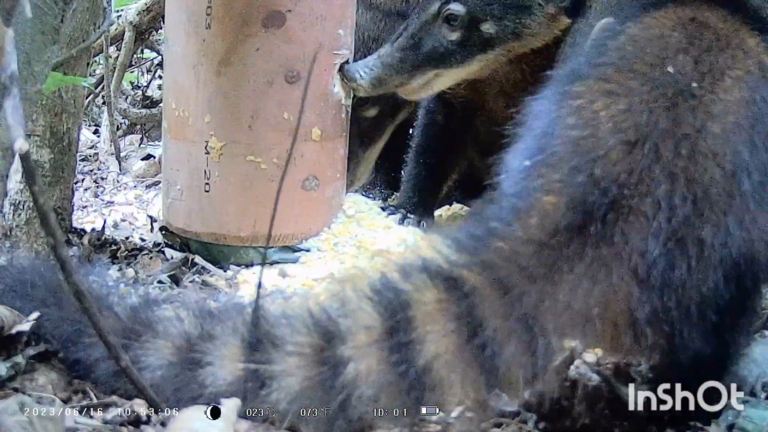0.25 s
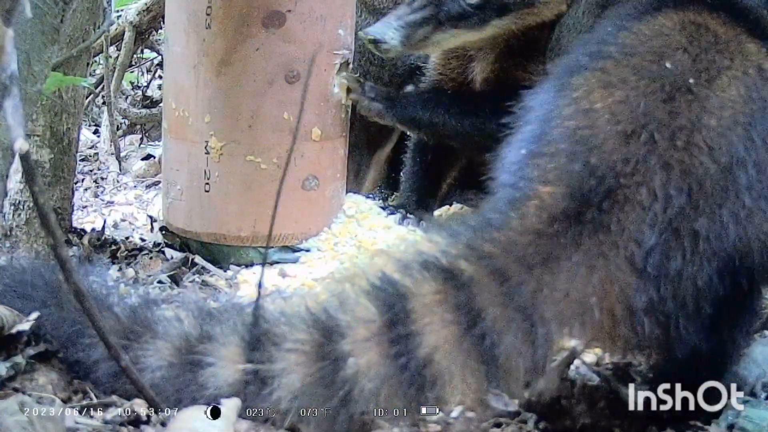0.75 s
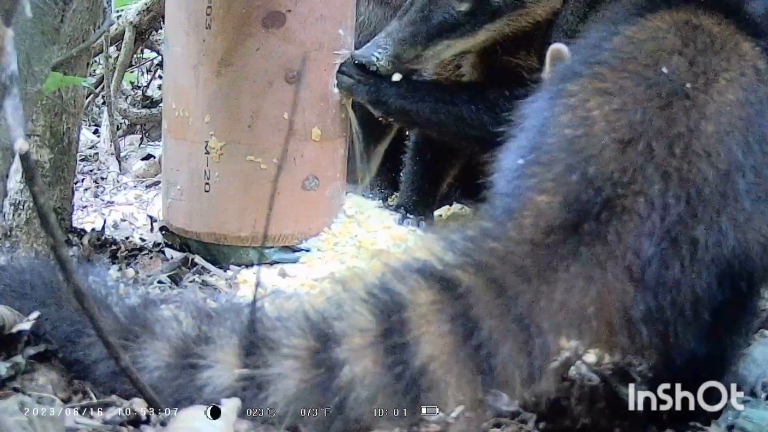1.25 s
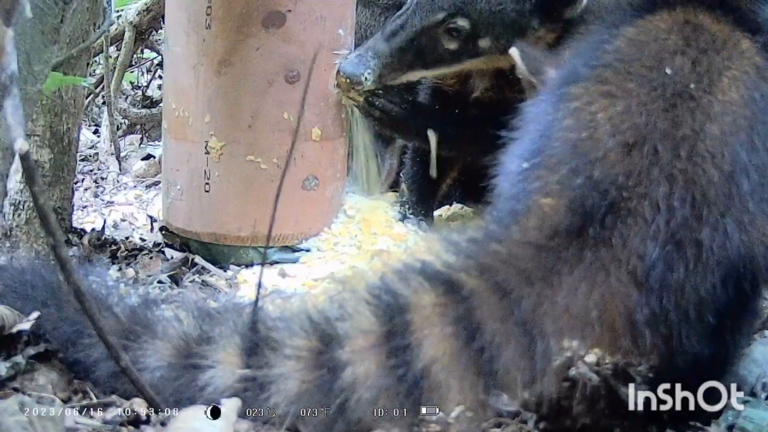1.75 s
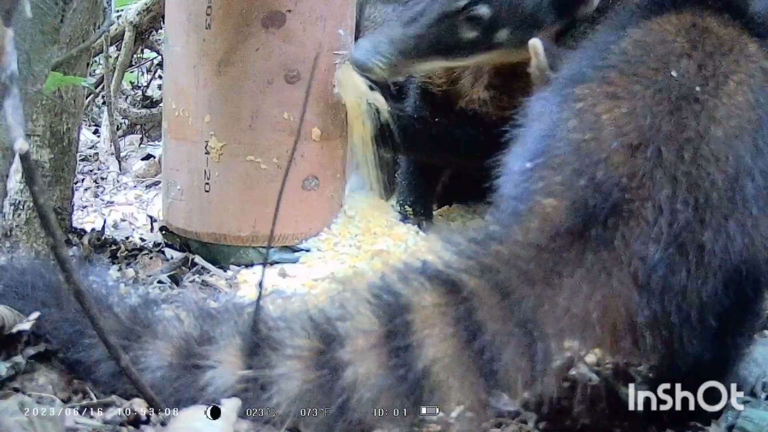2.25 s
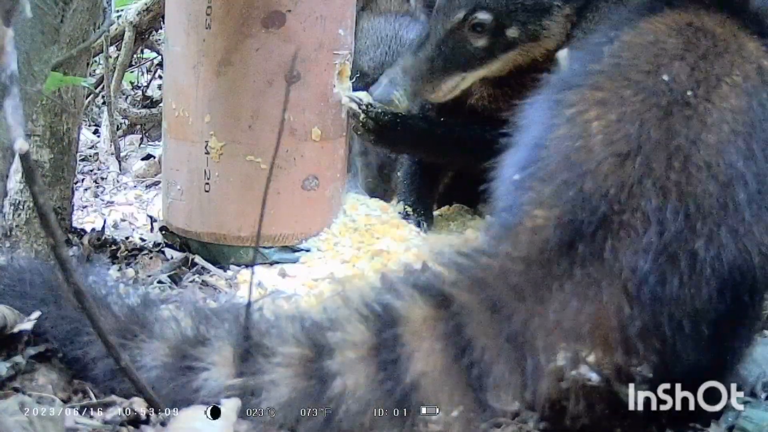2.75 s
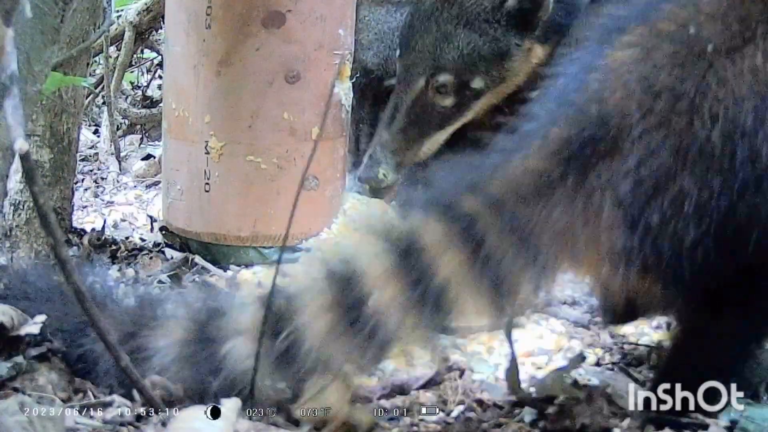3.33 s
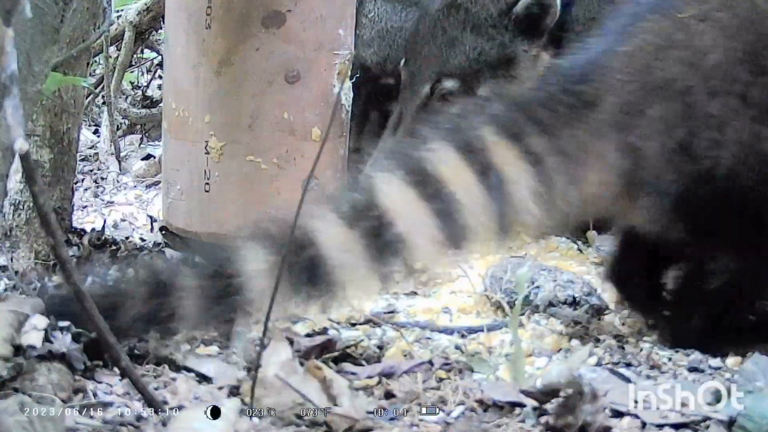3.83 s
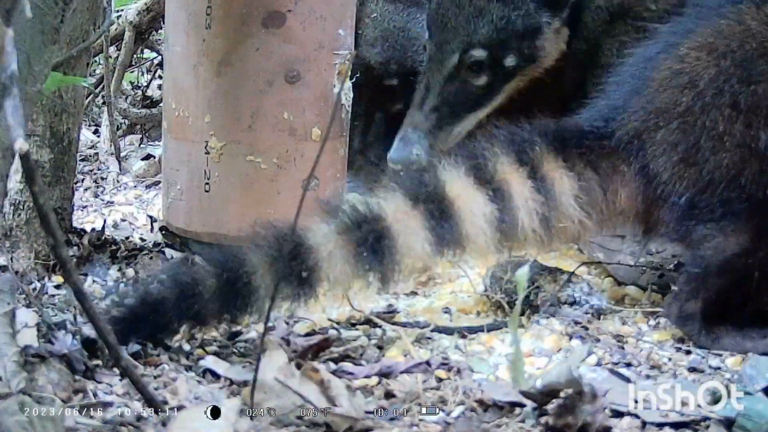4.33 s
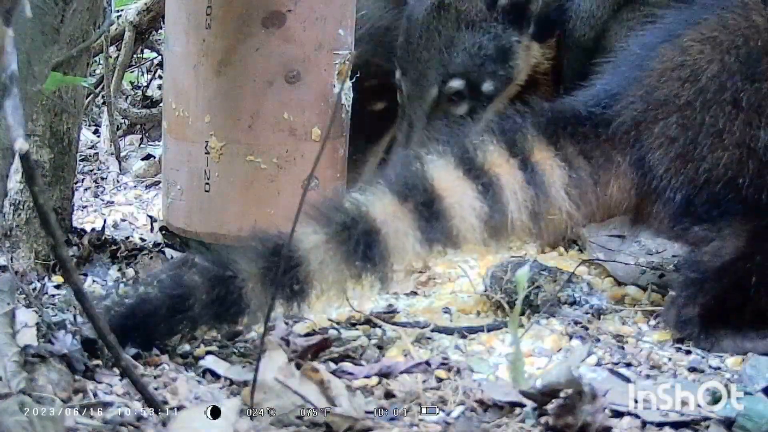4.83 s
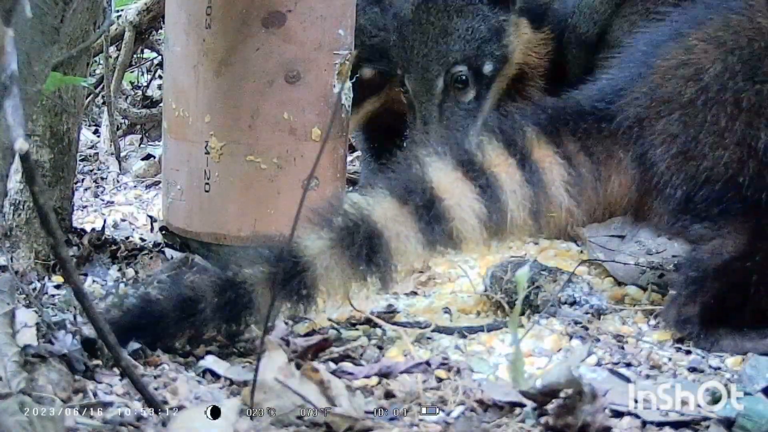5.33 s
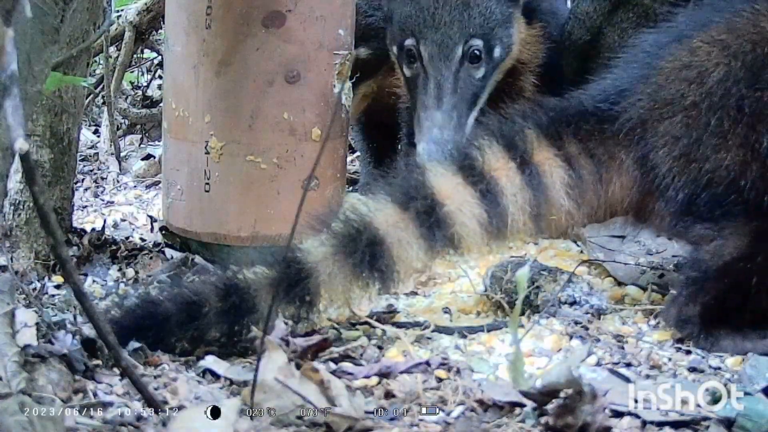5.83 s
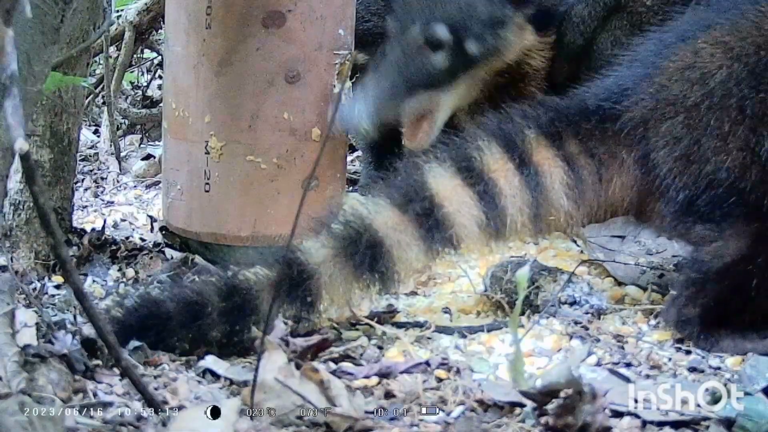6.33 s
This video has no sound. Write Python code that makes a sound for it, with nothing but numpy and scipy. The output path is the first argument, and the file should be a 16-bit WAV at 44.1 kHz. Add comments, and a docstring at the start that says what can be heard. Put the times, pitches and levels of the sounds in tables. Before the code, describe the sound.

Close chewing on the forest floor: sharp kernel cracks, moist jaw smacks, dry litter rustling, soft paw pats, quiet hum and hiss.

```python
"""Coatis at a corn pipe

Coatis feed at a corn pipe on the forest floor, close to a small microphone.
Kernels crack as bursts of tiny breaks ringing jaw, mouth and shell; wet jaws smack on slower bursts.
Paws pat with dull knocks, leaves and shells tick, and spilt meal trickles as grains and fluttering hiss.
Beneath lie shaped noise for rumble and hiss, a faint narrow hum, two soft low thuds and short forest echoes."""
import sys
import numpy as np
from scipy import signal
from scipy.fft import rfft, irfft
from scipy.io import wavfile

SR = 44100
rng = np.random.default_rng(int(sys.argv[2]) if len(sys.argv) > 2 else 0)


def put_to_file(sound):
    """Save the sound as 16-bit audio at rate SR, in the file named by the first command-line argument."""
    columns = np.atleast_2d(sound).T  # one column per channel
    safe = np.clip(columns, -1, 1)
    whole_steps = np.round(safe * 32767)
    wavfile.write(sys.argv[1], SR, whole_steps.astype(np.int16))


N = 289737
TIME = np.arange(N) / SR  # s

# where each part of a bite, smack, pat or tick sounds: low, high (Hz)
JAW_BAND, MOUTH_BAND, GRIT_BAND = (260, 900), (1200, 3000), (1100, 1650)
SNAP_BAND, SPLINTER_BAND, LEAF_BAND = (2800, 5600), (5100, 8200), (2200, 8500)


def amp(db):
    """Decibels to gain."""
    return 10 ** (np.asarray(db) / 20)


def unit(x):
    """Scales to rms 1."""
    return x / np.sqrt(np.mean(x ** 2) + 1e-20)


def sized(x, db):
    """Scales a short sound so its energy, spread over a hundredth of a second, has this rms level."""
    return amp(db) * x / np.sqrt(np.sum(x ** 2) / (SR / 100) + 1e-20)


def add(mix, s, sound):
    """Lays a sound into the mix, in place, at time s."""
    part = mix[max(round(s * SR), 0):][:len(sound)]
    part += sound[:len(part)]


def colour(x, points):
    """Filters a sound by a smooth curve through (Hz, dB) points."""
    hz, db = np.transpose(points)
    f = np.fft.rfftfreq(len(x), 1 / SR)
    gain = amp(np.interp(np.log(f + 1), np.log(hz), db))
    return irfft(rfft(x) * gain, len(x))


def ring(x, hz, width_hz):
    """One damped resonance."""
    return signal.lfilter(*signal.iirpeak(hz, hz / width_hz, SR), x)


def band(x, edges):
    """A broad resonance between two edges."""
    return signal.sosfilt(signal.butter(2, edges, "bandpass", fs=SR, output="sos"), x)


def low_noise(cut_hz):
    """Noise that varies no faster than about cut_hz."""
    return signal.sosfilt(signal.butter(2, cut_hz, fs=SR, output="sos"), rng.standard_normal(N))


def fracture(rise, decay, ragged=1.28):
    """A run of tiny uneven breaks that swells and dies within milliseconds (rise, decay in s)."""
    t = np.arange(2048) / SR
    breaks = rng.standard_normal(len(t))
    uneven = np.sign(breaks) * abs(breaks) ** ragged
    return uneven * (1 - np.exp(-t / rise)) * np.exp(-t / decay)


def background(air_db=-55, hum_hz=705, hum_width_hz=50, hum_db=-79.5):
    """Noise shaped into rumble and hiss, with noise through a double resonance as a narrow fuzzy hum."""
    # spectrum of rumble and hiss: f/Hz, relative level/dB
    air_spectrum = [(12, 6), (25, 4), (55, -1), (100, -3.5), (150, -8.5), (220, -15.5), (400, -20.5),
                    (650, -24), (1100, -28), (2000, -28), (4000, -33.5), (7000, -33.5), (8500, -35.5)]
    air = unit(colour(rng.standard_normal(N), air_spectrum))
    hum = ring(rng.standard_normal(N), hum_hz, hum_width_hz)
    hum = unit(ring(hum, hum_hz, hum_width_hz))
    return amp(air_db) * air + amp(hum_db) * hum


def forest(x, near_db=-14, near_t60=0.017, far_db=-26, far_t60=0.084):
    """The ground and pipe scatter a short tail; trunks return a fainter, longer one."""
    # colour of the returning sound: f/Hz, relative level/dB
    echo_spectrum = [(200, 2), (700, -5.5), (1800, -4), (3500, -6.5), (8000, -8)]
    t = np.arange(SR // 2) / SR
    echo = np.zeros(len(t))
    for db, t60 in [(near_db, near_t60), (far_db, far_t60)]:
        tail = colour(rng.standard_normal(len(t)), echo_spectrum)
        tail *= np.exp(-np.log(1000) * t / t60) * (1 - np.exp(-t / 0.0069))  # soft onset
        echo += amp(db) * tail / np.linalg.norm(tail)
    return signal.fftconvolve(x, echo)[:N]


def thuds():
    """Two soft, very low pushes through the soil, each with a lift before and after."""
    # heavy shifts of weight felt through the ground: t/s at the middle, f/Hz, peak level/dB
    weight_shifts = [(.806, 22, -42.5), (3.242, 28, -44.5)]
    out = np.zeros(N)
    for s, hz, db in weight_shifts:
        u = (np.pi * hz * (TIME - s)) ** 2
        out += amp(db) * (2 * u - 1) * np.exp(-u)
    return out


def stirring():
    """How strongly meal and leaves move: a slow shuffle, and one rise and fall for each slide."""
    # how much the litter is stirred between slides: t/s, level/dB
    shuffle = [(0, -71), (.25, -74), (1.1, -70.5), (2.1, -73), (3.2, -71.5), (3.55, -75), (3.8, -71),
               (5.4, -76), (6.57, -73)]
    # meal and litter sliding after a push of a paw or snout: t/s at the start, length/s, peak level/dB
    pushes = [(1.468, .15, -64.5), (2.283, .21, -63), (2.571, .09, -67), (3.314, .08, -65.5),
              (4.018, .2, -68)]
    stir = amp(np.interp(TIME, *np.transpose(shuffle)))
    for s, length, db in pushes:
        arch = np.sin(np.pi * np.clip((TIME - s) / length, 0, 1))
        stir = np.hypot(stir, amp(db) * arch)
    return stir


def tick(hz, db):
    """Something brittle, a leaf or a shell, gives a thin tick: a very short fracture through one resonance."""
    snap = fracture(rise=0.00042, decay=0.00089)
    return sized(band(ring(snap, hz, 980), LEAF_BAND), db)


def grains(stir, level_db=-75, spread_db=4.0, again_s=0.013, again_db=-4, count=420):
    """Falling grains tick on leaves, most often where the litter is stirred most."""
    low_hz, high_hz = 2750, 7300  # range of the ticks
    out = np.zeros(N)
    busy = np.cumsum(stir) / stir.sum()
    for when, pitch, size, hop, next_pitch in rng.random((count, 5)):
        s = np.interp(when, busy, TIME)
        db = level_db - spread_db * np.log(size + 0.0061)  # a few are much louder
        add(out, s, tick(low_hz + (high_hz - low_hz) * pitch, db))
        # it bounces onto another leaf
        next_hz = low_hz + (high_hz - low_hz) * next_pitch
        add(out, s + again_s * (.5 + hop), tick(next_hz, db + again_db))
    return out


def sliding_meal(stir, flutter_db=3.8, flutter_hz=35):
    """Shaped hiss whose level flutters, as the meal slips in little clumps."""
    # hiss of sliding meal: f/Hz, relative level/dB
    slide_spectrum = [(300, -8), (1000, -6.5), (1900, -2), (3000, -5.5), (4200, -4), (6800, -6.5),
                      (8500, -11)]
    flutter = unit(low_noise(flutter_hz))
    slide = unit(colour(rng.standard_normal(N), slide_spectrum))
    return amp(flutter_db * flutter) * stir * slide


def litter():
    """Single bright ticks over a fine patter of grains and an uneven hiss of sliding meal."""
    # brittle bright ticks: dry leaves, and a tooth on a shell just before it cracks (3.937 s):
    # t/s, f/Hz, level/dB
    bright_ticks = [(0.174, 3400, -58.5), (0.626, 5900, -53), (0.84, 5400, -57), (0.854, 4630, -51.5),
                    (1.065, 4730, -62), (2.156, 6260, -50.5), (2.171, 6500, -55), (3.194, 6600, -57),
                    (3.937, 5200, -49.5), (4.132, 6630, -56), (4.385, 7400, -48.5), (4.812, 5300, -56.5),
                    (5.113, 5700, -59), (5.202, 6800, -57), (5.963, 7700, -54.5), (6.295, 7260, -57.5)]
    out = np.zeros(N)
    for s, hz, db in bright_ticks:
        add(out, s, tick(hz, db))
    stir = stirring()
    return out + grains(stir) + sliding_meal(stir)


def pats(body_hz=380):
    """Padded paws land with a dull, short knock."""
    # paws patting the ground and the pipe: t/s, level/dB
    paw_pats = [(.891, -62), (1.032, -59.5), (2.27, -58), (2.623, -59), (3.353, -60), (3.508, -55.5),
                (4.589, -56.5), (5.713, -56.5)]
    out = np.zeros(N)
    for s, db in paw_pats:
        knock = band(fracture(rise=0.0012, decay=0.0024), JAW_BAND)
        add(out, s, sized(ring(knock, body_hz, 320), db))
    return out


def smack(mouth_hz, mouth_db, crunch_db, splinter_db, jaw_db=-12):
    """Teeth on crumbs or shell: a slower break through mouth, jaw and treble bands."""
    crush = fracture(rise=0.00021, decay=0.0032)
    mouth = sized(ring(band(crush, MOUTH_BAND), mouth_hz, 190), mouth_db)
    jaw = sized(band(crush, JAW_BAND), mouth_db + jaw_db)
    crunch = sized(band(crush, SNAP_BAND), crunch_db)
    splinter = sized(band(crush, SPLINTER_BAND), splinter_db)
    return mouth + jaw + crunch + splinter


def munching(level_db=-68, spread_db=4, crunch_db=-4, splinter_db=-5, count=110):
    """Faint smacks of the same chewing, loosely one after another, rising and falling in level."""
    # gain on all the munching: t/s, level/dB
    munch_gain = [(0, 6), (1.4, 0), (2.1, -1), (2.7, 6), (4.3, 5), (5.4, 4.5), (6.57, -4)]
    out = np.zeros(N)
    for k, (when, opening, size, bright) in enumerate(rng.random((count, 4))):
        db = level_db + spread_db * (2 * size - 1)
        s = (k + 2 * when) / count * TIME[-1]
        # crunch_db and splinter_db are the averages relative to the mouth's level
        crunch, splinter = db + 2 * crunch_db * bright, db + 2 * splinter_db * bright
        add(out, s, smack(1450 + 1200 * opening, db, crunch, splinter))
    return out * amp(np.interp(TIME, *np.transpose(munch_gain)))


def chewing(splinter_db=-4, release_s=0.0086, release_db=-9):
    """The louder smacks: teeth close on crumbs, or touch a shell just before it cracks, then part softly."""
    # loud smacks, those at 1.831, 1.953 and 2.3 s being a tooth meeting a shell before it breaks:
    # t/s, mouth f/Hz, mouth level/dB, crunch level/dB
    loud_smacks = [(0.228, 1350, -62, -83), (0.427, 3500, -58, -50.5), (0.721, 3040, -56, -58.5),
                   (1.831, 1800, -55, -54), (1.953, 2030, -59.5, -59), (2.148, 2270, -57, -66),
                   (2.3, 2350, -55, -53.5), (2.434, 2110, -51.5, -55), (2.594, 1990, -54.5, -54.5),
                   (2.622, 3200, -56, -51), (2.795, 1820, -58, -61.5), (2.948, 2780, -64, -53.5),
                   (3.027, 1950, -56, -70), (3.151, 2300, -59, -61), (3.265, 1900, -57.5, -62.5),
                   (3.451, 1880, -58.5, -57.5), (3.635, 1860, -52.5, -59), (3.717, 1880, -55, -59),
                   (3.817, 1780, -59.5, -56.5), (3.915, 2000, -57.5, -59), (4.052, 2050, -55, -59),
                   (4.079, 2020, -52.5, -54), (4.142, 2040, -58, -73), (4.231, 1960, -58.5, -59.5),
                   (4.278, 2260, -58, -63), (4.405, 1310, -55.5, -60), (4.589, 2250, -53.5, -57),
                   (4.799, 1750, -55, -60), (4.981, 2400, -55, -57), (5.01, 1920, -58.5, -56.5),
                   (5.683, 2040, -57, -60), (5.898, 2160, -56.5, -56), (6.14, 2000, -61.5, -67),
                   (6.395, 2600, -55, -54.5)]
    out = np.zeros(N)
    for s, mouth_hz, mouth_db, crunch_db in loud_smacks:
        voice = mouth_hz, mouth_db, crunch_db, crunch_db + splinter_db
        add(out, s, smack(*voice))
        add(out, s + release_s * (.5 + rng.random()), amp(release_db) * smack(*voice))
    return out


def split(main_break=0.82, after=.0005):
    """Tiny breaks run ahead of and behind the one that splits the kernel, `after` seconds in."""
    crack = fracture(rise=0.00094, decay=0.0011)
    crack[round(after * SR)] += main_break * np.linalg.norm(crack)
    return crack


def bites(splinter_hz=6600, jaw_width_hz=260, mouth_width_hz=240, snap_width_hz=550,
          skull_hz=360, skull_db=-10, overtone=1.5, overtone_db=-7, crumbs_db=-14, scatter_db=-21):
    """Each fracture knocks the jaw, rings the mouth cavity and snaps the hard shell."""
    # kernels cracking: t/s, jaw f/Hz, jaw knock level/dB, mouth f/Hz, mouth level/dB,
    # snap f/Hz, snap level/dB, grit level/dB
    kernel_cracks = [(0.0811, 586, -43, 2420, -45, 3340, -41.5, -43.5),
                     (1.616, 494, -49.5, 1900, -40.5, 4800, -47.5, -65),
                     (1.841, 350, -54, 1710, -44.5, 4310, -46.5, -53),
                     (1.9626, 300, -72, 1960, -54, 4470, -57.5, -72),
                     (2.3048, 556, -52.5, 1550, -41.5, 4030, -59.5, -75),
                     (2.8401, 690, -57.5, 2320, -55, 3950, -53.5, -56),
                     (3.7049, 676, -50.5, 1730, -49.5, 3600, -48.5, -61),
                     (3.7698, 392, -64, 1990, -49.5, 4300, -64.5, -68),
                     (3.774, 300, -55.4, 1800, -48.5, 3880, -60, -60),
                     (3.942, 773, -29.5, 2220, -35, 3520, -29.5, -36.5),
                     (4.1639, 520, -53, 1380, -48.5, 4180, -45.5, -66),
                     (4.4403, 630, -43, 1880, -47.5, 3520, -41, -56),
                     (4.4496, 720, -55.5, 1710, -57, 3900, -52, -70),
                     (4.7271, 370, -54.5, 1950, -52.5, 3570, -48, -63),
                     (4.7476, 640, -45, 1740, -50, 3300, -53.5, -70),
                     (4.7691, 660, -76, 2350, -52, 4100, -58, -72),
                     (5.3366, 336, -66, 1470, -60.5, 3300, -52, -70),
                     (5.797, 523, -55, 2070, -51, 3900, -49, -70),
                     (6.0953, 386, -58, 2200, -49.5, 4100, -51.5, -75),
                     (6.3649, 605, -49.5, 1454, -46.4, 3200, -46.5, -60)]
    # a harder shell snaps higher and splinters more: at this pitch splinters are as loud as the snap
    hard_shell_hz, splinter_db_per_octave = 3950, 27
    out = np.zeros(N)
    for s, jaw_hz, jaw_db, mouth_hz, mouth_db, snap_hz, snap_db, grit_db in kernel_cracks:
        splinter_db = snap_db + splinter_db_per_octave * np.log2(snap_hz / hard_shell_hz)
        shell_db = (snap_db + splinter_db) / 2
        jaw = ring(band(split(main_break=2.7), JAW_BAND), jaw_hz, jaw_width_hz)
        # the whole head answers at its own low pitch
        skull = ring(ring(split(main_break=1.1), skull_hz, 220), skull_hz, 220)
        mouth = ring(band(split(main_break=0.86), MOUTH_BAND), mouth_hz, mouth_width_hz)
        snap = band(ring(split(), snap_hz, snap_width_hz), SNAP_BAND)
        # the shell's second mode
        upper = band(ring(split(), overtone * snap_hz, snap_width_hz), LEAF_BAND)
        splinter = band(ring(split(), splinter_hz, 1500), SPLINTER_BAND)
        grit = band(fracture(rise=0.00035, decay=0.00079), GRIT_BAND)
        # fragments crumble afterwards, and the finest scatter
        crumbs = band(fracture(rise=0.0022, decay=0.0092, ragged=2.6), LEAF_BAND)
        scatter = band(fracture(rise=0.006, decay=0.016, ragged=2.6), LEAF_BAND)
        parts = [(jaw, jaw_db), (skull, jaw_db + skull_db), (grit, grit_db), (mouth, mouth_db),
                 (snap, snap_db), (upper, snap_db + overtone_db), (splinter, splinter_db),
                 (crumbs, shell_db + crumbs_db), (scatter, shell_db + scatter_db)]
        add(out, s, sum(sized(*part) for part in parts))
    return out


def scene():
    """The feeding animals in their clearing."""
    feeding = bites() + chewing() + munching() + litter() + pats()
    return (feeding + forest(feeding) + thuds() + background())[None]


def record(dry, soft_hz=7450, cut_hz=8600, offset=.008):
    """The small microphone rounds off the top; the recorder cuts what lies higher and sits off zero."""
    soft = signal.sosfilt(signal.butter(7, soft_hz, fs=SR, output="sos"), dry)
    cut = signal.firwin(101, cut_hz, window=("kaiser", 7), fs=SR)
    return signal.oaconvolve(soft, cut[None], "same") + offset


dry = scene()
out = record(dry)
put_to_file(out)
```